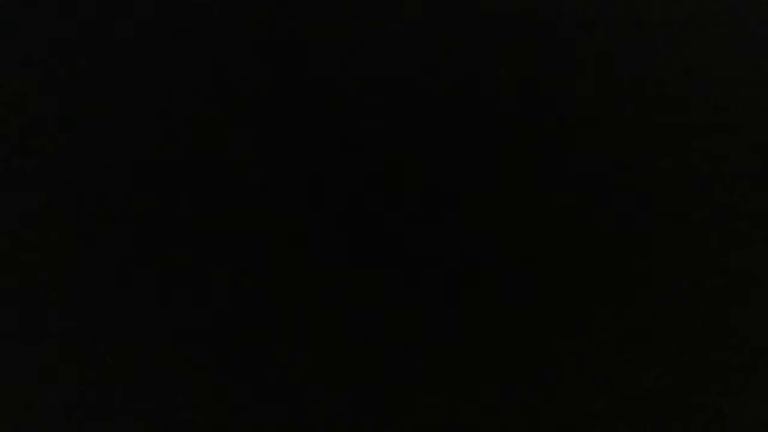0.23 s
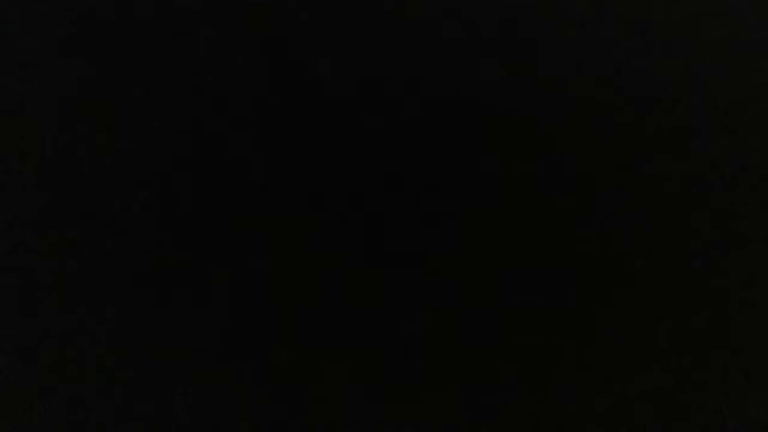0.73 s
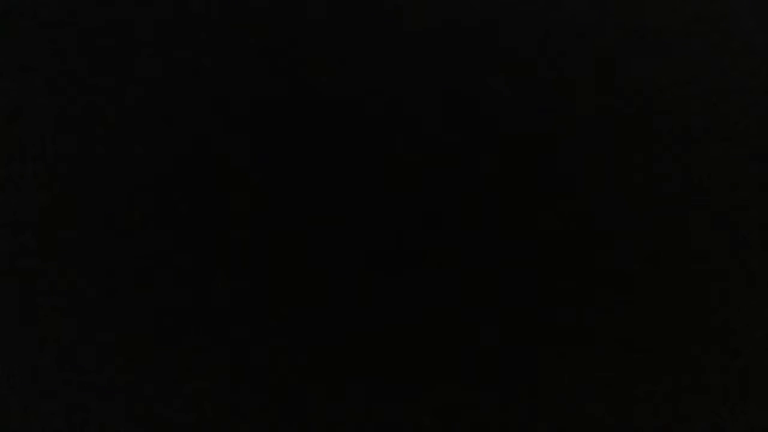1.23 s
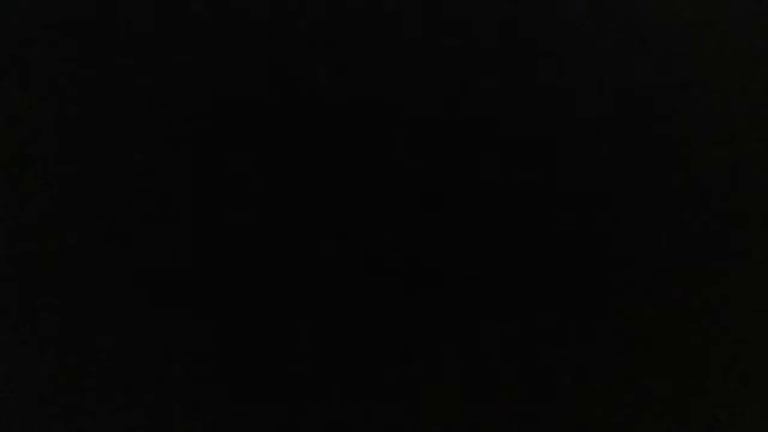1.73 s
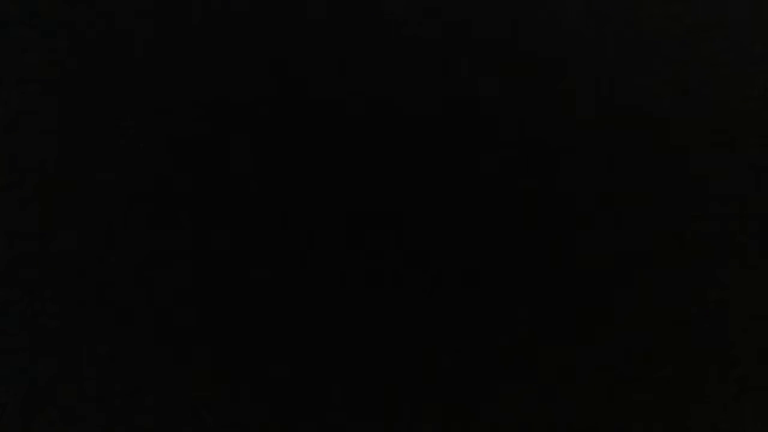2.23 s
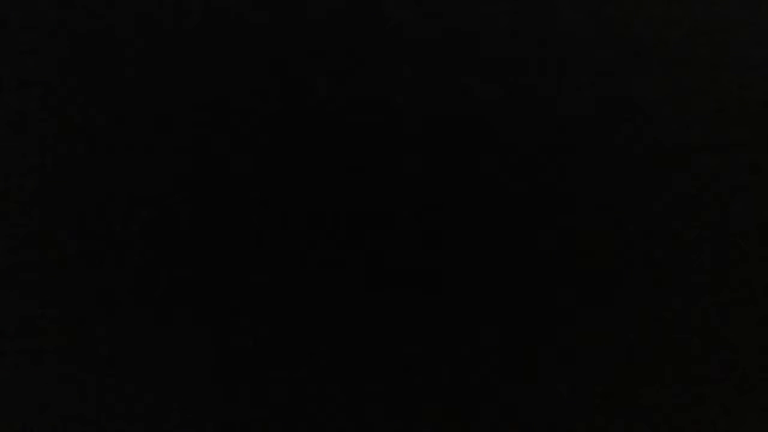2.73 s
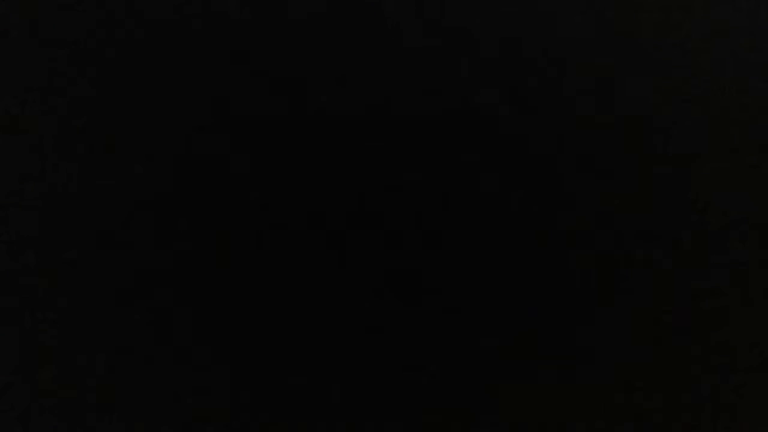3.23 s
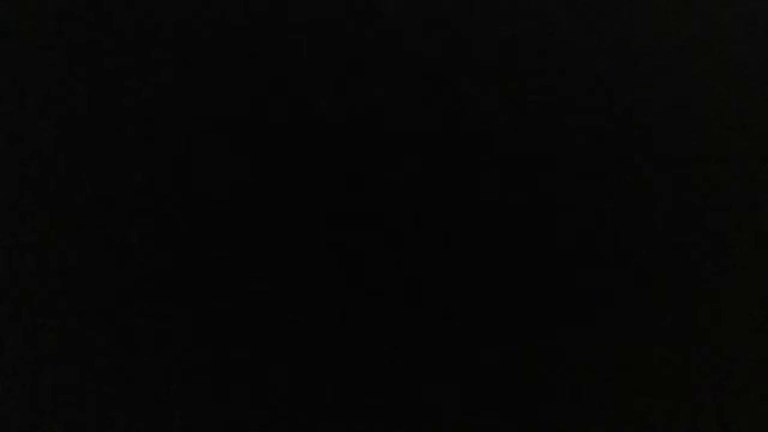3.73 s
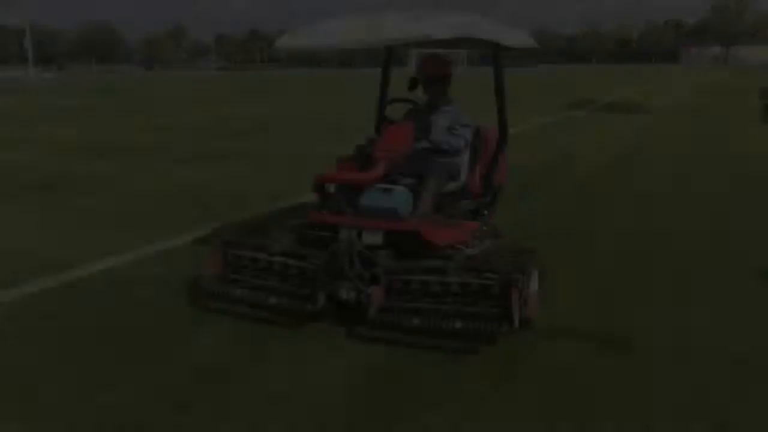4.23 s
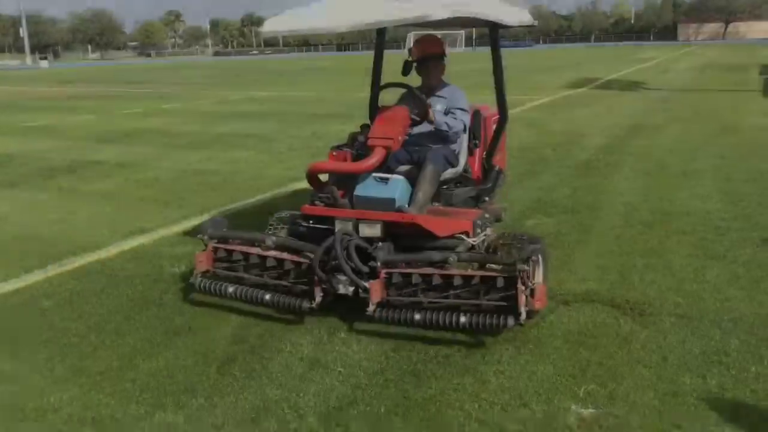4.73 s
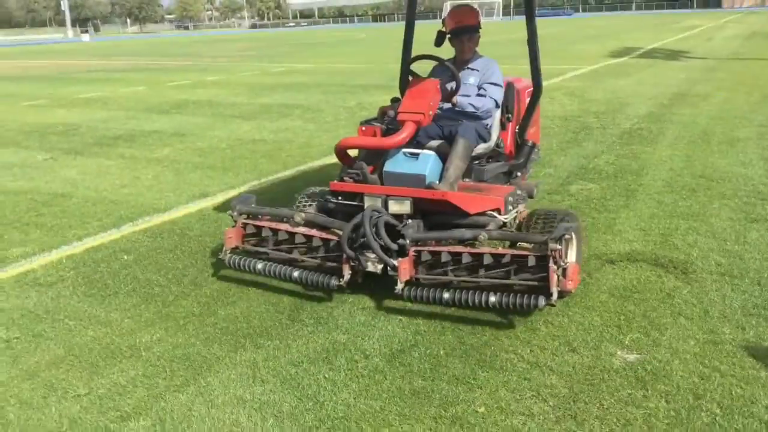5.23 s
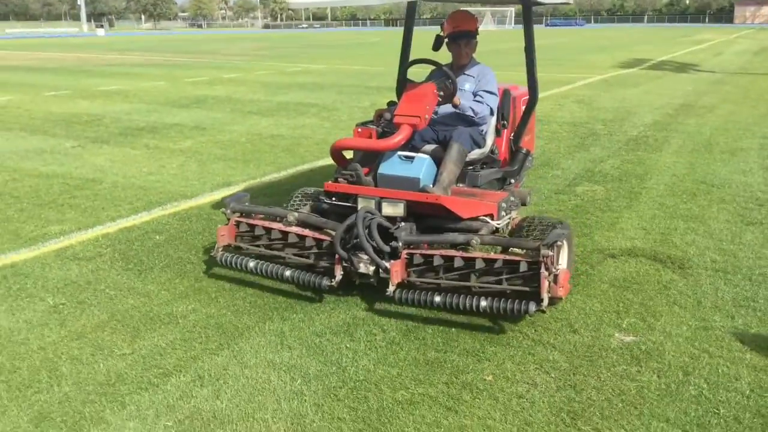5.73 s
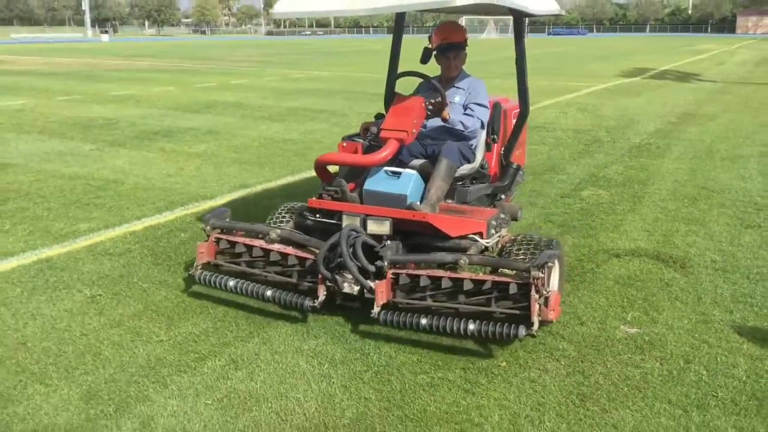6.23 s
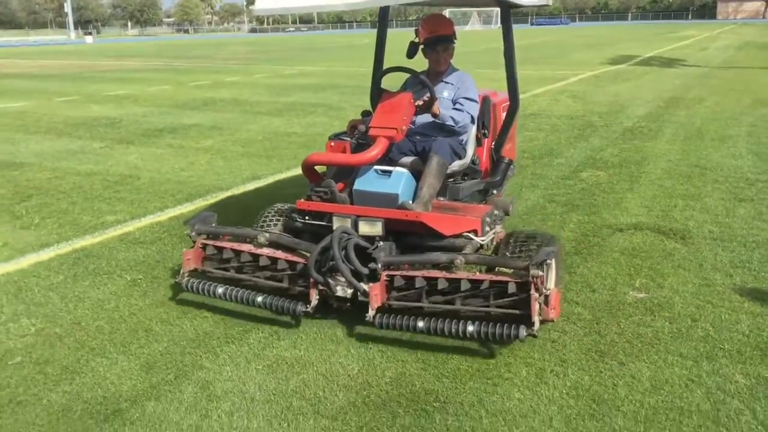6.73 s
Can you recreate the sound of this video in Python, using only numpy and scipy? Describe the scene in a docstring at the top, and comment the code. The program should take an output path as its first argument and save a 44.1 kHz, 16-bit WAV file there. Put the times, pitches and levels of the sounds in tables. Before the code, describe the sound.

A riding reel mower's diesel engine fades in and drones steadily outdoors, rattling and whining, with brief metallic squeaks and one late clank.

```python
"""A riding reel mower on a sports field, in open air: one mono microphone, no room around it.
From silence its sound fades in over the first second: diesel firing lines boom over coloured noise, loose
links rap as short rings, a fan hums, pump lines whine, and reels hiss, tick and ring. Gliding tones squeak
before 1 s; to about 3 s the engine sags under load and booms harder; faint chirps follow around 3-4 s as
the treble slowly recedes and the rumble comes nearer. Near 6 s a cutting unit clanks on its ringing modes."""
import sys
import numpy as np
from scipy import signal
from scipy.fft import rfft, irfft, next_fast_len
from scipy.io import wavfile

SR = 44100
rng = np.random.default_rng(int(sys.argv[2]) if len(sys.argv) > 2 else 0)


def digitize_waveform(pressure):
    """Quantize a signal to 16-bit integers and store it at the path in sys.argv[1].

    Rows of a 2-D input are taken as channels; values are limited to [-1, 1].
    """
    field = np.atleast_2d(pressure).T
    bounded = np.clip(field, -1, 1)
    quanta = np.round(bounded * 32767).astype(np.int16)
    wavfile.write(sys.argv[1], SR, quanta)


N = 307818
TIME = np.arange(N) / SR

# All levels hold ahead of the opening fade. Colours are relative; a part's own level sets its loudness.
# Engine speed, sagging as the reels take load: (time [s], firing rate [1/s])
ENGINE_SPEED = [(0.25, 64.7), (1.0, 64.41), (1.5, 63.83), (2.3, 63.93), (2.9, 63.69), (3.6, 64.11),
                (4.05, 64.04), (4.6, 64.33), (6.8, 64.27)]
CYLINDERS = 3   # each fires once a four-stroke cycle
FREE_FIRINGS_PER_S, FULL_LOAD_SAG_PER_S = 64.35, 0.55
PUMP_TURNS_PER_CYCLE, FAN_TURNS_PER_CYCLE = 2.3475, 2.38

# Exhaust partials: (multiple of firing rate [-], level running free at 0 s [dB],
# added at full load [dB], gain over time [dB/s], waver running free [dB])
EXHAUST_PARTIALS = [(1, -32, -7.5, 0.44, 2.06), (2, -21.5, 1.75, -0.14, 0.73), (3, -34, -4.5, 0.38, 0.8),
                    (4, -44, 6, 0.84, 1.5), (5, -37.5, -8.5, -0.18, 0), (8, -54, 10, 0.16, 3)]
LOAD_UNSTEADINESS = 0.65   # share by which the waver grows at full load
# Lesser engine lines: (multiple of the four-stroke cycle rate [-], relative level [dB])
ENGINE_LINES = [(4, -7.5), (5, -8), (7, -4), (8, -3.5), (10, -11.5), (14, -20), (21, -18), (26, -15),
                (27, -15), (30, -13), (36, -13.5), (39, -15), (45, -14.5)]
ENGINE_LINES_DB, ENGINE_LINES_LOAD_DB = -38, 3   # running free; added at full load
# Brief exhaust surges that shake the frame; negative values dip:
# (centre time [s], boom rise [dB], shake rise [dB])
THROBS = [(1.02, 1, 0), (1.182, 2.5, -1), (1.251, 1.5, 4), (1.417, 0, 1), (1.472, 0, 5), (1.578, 2.5, 1.5),
          (1.793, 1.5, 4.5), (2.112, 2.5, 7.5), (2.285, 0.7, 6.5), (2.44, 2, 6), (2.622, 1.2, 10),
          (2.792, 1.5, 14), (2.93, 0, -1), (3.046, 3, 8), (3.202, 2, -1), (3.396, 2.5, 8), (3.675, 1.5, 4),
          (3.8, 1.5, 6), (4.257, 0, 3), (4.333, 2, 5), (4.692, 2, 8), (4.819, 1.5, 2), (5.343, 1, 3),
          (5.869, 1, 4), (6.505, 0, 4), (6.767, -1.5, 5), (6.919, 0.5, 1)]
THROB_S, THUD_FOLLOWS = 0.088, 0.97   # surge length; share of the shake rise taken by the firing thud

# Frame shudder: (frequency [Hz], relative density [dB])
SHUDDER_COLOUR = [(18, -23), (32, -3), (45, -5), (58, 14), (75, -21)]
SHUDDER_DB, SHUDDER_LOAD_DB = -45, -0.5   # running free; added at full load
# Engine rumble: (frequency [Hz], relative density [dB])
RUMBLE_COLOUR = [(50, -31), (70, -4.5), (100, -0.5), (140, -9.5), (185, 1), (250, -5.5), (340, -19),
                 (420, -11.5), (700, -26.5)]
RUMBLE_DB, RUMBLE_LOAD_DB = -31.8, -1.3   # running free at 0 s; added at full load
APPROACH_DB_PER_S = 0.48   # the rumble gains as the mower creeps nearer
# Clatter of driven parts: (frequency [Hz], relative density [dB])
CLATTER_COLOUR = [(250, -17.5), (400, -7), (490, -7.5), (590, 1), (750, -0.5), (830, -6.5), (1000, -10.5),
                  (1500, -19.5)]
CLATTER_DB, CLATTER_LOAD_DB = -32, -1   # running free; added at full load
# Knock of the engine block: (frequency [Hz], relative density [dB])
KNOCK_COLOUR = [(700, -17), (1000, -0.5), (1350, 0.5), (1650, -4), (1950, -1), (2200, -4), (2500, -6.5),
                (2850, -14), (4000, -75)]
KNOCK_DB, KNOCK_LOAD_DB = -34.5, 0.5   # running free, before the treble recedes; added at full load
# The treble recedes after this time; the raps fall along with the knock
DULLING_FROM_S, KNOCK_FALL_DB_PER_S, HISS_FALL_DB_PER_S, RING_FALL_DB_PER_S = 3.15, 0.63, 0.94, 1

# Raps of loose links and covers: (frequency [Hz], relative density [dB])
RAP_COLOUR = [(350, -9), (600, 8.5), (1000, 3), (1700, -2), (2200, -3), (2600, -12), (3100, -30)]
RAP_DB, RAPS_PER_S, RAP_RING_S = -39, 170, 0.0043   # level before the treble recedes; rate; decay constant

# Cooling fan lines: (multiple of the fan's turning rate [-], relative level [dB])
FAN_LINES = [(2, -7.5), (4, -8.5), (5, -10), (6, -8), (7, -12.5), (8, -21.5)]
# The fan's wash of air: (frequency [Hz], relative density [dB])
WASH_COLOUR = [(240, -6.5), (290, -1.5), (360, -2), (450, -20)]
# Swing of the low mids: (time [s], level [dB])
LOW_MID_LEVEL = [(0.6, -1), (1.25, 3.5), (2.1, 5), (2.75, 1.5), (3.35, -10), (4.4, 2), (5.1, 2.5), (5.8, 3),
                 (6.6, 2)]
FAN_DB, FAN_LOAD_DB, WASH_DB = -32, -2, -42   # lines running free; added at full load; wash; all before the swing
FAN_FOLLOWS = 0.44   # share of the swing taken by the fan's lines

# Hydraulic whines: (time [s], piston level [dB], gear level [dB], piston octave level [dB])
WHINES = [(0.3, -37, -30.5, -40), (0.55, -34.5, -44, -44), (0.87, -53, -37, -45), (1.08, -50, -37.5, -40.5),
          (1.22, -34, -34, -49), (1.5, -31, -42, -48), (1.8, -36, -34, -38), (2.1, -34.5, -31, -34),
          (2.3, -37.5, -31.5, -34.5), (2.45, -44.5, -32, -38.5), (2.7, -37.5, -39, -39.5),
          (2.95, -39.5, -37, -42), (3.2, -40, -46, -37.5), (3.55, -43, -43, -43.5),
          (3.78, -42.5, -47, -34.3), (4.25, -42.5, -38.5, -38.5), (4.55, -40.5, -36.5, -40.5),
          (4.8, -44, -37.5, -52), (5.25, -43.5, -43, -43), (5.8, -42.5, -38.5, -39), (6.4, -41, -47, -56),
          (6.9, -55, -43, -63)]
DRIVE_HUM_DB, DRIVE_HUM_LOAD_DB = -50.5, 8   # running free; added at full load

# Reels in the grass: (frequency [Hz], relative density [dB])
HISS_COLOUR = [(1800, -67), (3100, -0.5), (3400, -5), (3950, -4), (4300, -2), (5200, -4.5), (6100, -4.5),
               (7100, -2), (7700, -7), (8500, -1.5), (9500, -2.5), (12500, -8.5), (14500, -16.5),
               (15800, -25)]
HISS_DB = -45.5   # before the treble recedes
TICKING_DB, TICKING_LOAD_DB = -48.5, 1   # running free; added at full load
# Lower blade and bed-knife rings, beside a steady singing tone:
# (frequency [Hz], width [Hz], relative level [dB])
LOW_RINGS = [(2200, 200, -4.5)]
# Higher blade and bed-knife rings: (frequency [Hz], width [Hz], relative level [dB])
HIGH_RINGS = [(3620, 36, -1.5), (5430, 60, -6)]
SING_HZ, SING_DB = 2138, -2   # level relative to the low rings
LOW_RING_DB, HIGH_RING_DB = -47, -58.5   # between rubs, before the treble recedes
# A reel presses on its bed knife; negative values soften:
# (start time [s], length [s], low ring rise [dB], high ring rise [dB])
BLADE_RUBS = [(0.85, 0.24, 15, 3), (1.14, 0.11, 7, 0), (1.35, 0.22, 9.5, -6), (1.568, 0.18, 11.5, -7),
              (1.84, 0.082, 9, 0), (3.1, 0.4, 5, 6), (3.68, 0.24, 4, 0), (3.93, 0.13, 6, 4),
              (4.1, 0.2, 8.5, 0), (3.95, 1.2, 2.5, 9), (6.25, 0.52, -1, 11.5)]

# Stick-slip squeaks: (start time [s], length [s], start pitch [Hz], end pitch [Hz],
# level [dB], roughness [share of the pitch])
SQUEAKS = [(.808, .04, 4300, 3950, -44, .04), (.843, .026, 4700, 4950, -40, .03),
           (.842, .075, 4020, 3800, -36, .012), (.847, .02, 5900, 5600, -39, .07),
           (.851, .018, 11350, 11200, -35.5, .012), (.853, .033, 5440, 5410, -26.5, .009),
           (.858, .032, 10750, 10500, -36, .022), (.878, .022, 5400, 5430, -35, .012),
           (.875, .025, 3880, 3860, -38, .015), (.903, .03, 5500, 5470, -39, .02),
           (.921, .012, 5350, 5300, -37, .04), (.941, .014, 5620, 5660, -39, .02),
           (.99, .08, 1010, 990, -32, .04), (3.21, .025, 2130, 2050, -37, .06),
           (3.25, .035, 1900, 1960, -36, .06), (3.303, .025, 1950, 2200, -34, .09),
           (3.345, .045, 1880, 1900, -39.5, .07), (3.397, .03, 1830, 2000, -32, .07),
           (3.69, .065, 2280, 2130, -36, .03), (3.963, .035, 2250, 2040, -33.5, .03),
           (5.925, .025, 5750, 5830, -46, .015), (6.502, .02, 5700, 5850, -44.5, .015)]
SQUEAK_T60_S, SQUEAK_TAIL_DB = 0.15, -11
# A cutting unit rattles: (start time [s], length [s], ring level [dB], scrape level [dB])
RATTLES = [(.843, .025, -52, -43), (.903, .045, -43, -38.5), (6.081, .025, -44, -48)]
# Cutting unit modes: (frequency [Hz], width [Hz], relative level [dB])
UNIT_MODES = [(1380, 45, 2), (2330, 150, -7), (3130, 100, -16), (4250, 80, -15), (4560, 80, -17),
              (6500, 120, -18)]
# A cutting unit drops and bounces: (time [s], level [dB], brightness [dB per octave above the lowest mode])
CLANKS = [(6.078, -25.5, -8), (6.084, -41, 4.5), (6.091, -35.5, 3), (6.104, -41, 3), (6.113, -38, -3)]
CLANK_RISE_S, CLANK_CHATTER = 0.004, 0.13   # chatter: spread of the ring's phase, in cycles

FADE_START_S, FADE_S, CLOSE_S = 0.097, 1.01, 0.015
CUTOFF_HZ = 16200   # 70 dB down from here up


def from_db(db):
    """Decibels to gain."""
    return 10 ** (np.asarray(db) / 20)


def rms_one(x):
    """Scale to unit rms."""
    return x / np.sqrt(np.mean(x ** 2) + 1e-20)


def in_time(rows):
    """Each column of a curve, at every sample."""
    s, *columns = np.transpose(rows)
    return [np.interp(TIME, s, c) for c in columns]


def drift(rate):
    """Slow random wandering with spread 1; rate is its corner in Hz."""
    step = 40   # samples between computed points
    r = np.exp(-2 * np.pi * rate * step / SR)
    noise = rng.standard_normal(N // step + 2002)
    slow = signal.lfilter([1], [1, -2 * r, r * r], noise)[2000:]   # skip the filter's settling
    return np.interp(np.arange(N) / step, np.arange(len(slow)), rms_one(slow))


def coloured(x, colour):
    """Shape an excitation's spectrum by a colour, with skirts outside it; rms 1."""
    hz, db = np.transpose(colour)
    size = next_fast_len(N)
    f = np.maximum(np.arange(size // 2 + 1) * SR / size, 1)
    skirts = np.minimum(f / hz[0], 1) ** 3 * np.minimum(hz[-1] / f, 1) ** 3
    gain = skirts * from_db(np.interp(np.log(f), np.log(hz), db))
    return rms_one(irfft(rfft(x, size) * gain, size)[:N])


def resonate(x, hz, width_hz):
    """One damped mode answers an excitation; a wider mode dies sooner."""
    r = np.exp(-np.pi * width_hz / SR)
    return signal.lfilter([1, 0, -1], [1, -2 * r * np.cos(2 * np.pi * hz / SR), r * r], x)


def rubbed(modes):
    """Resonances kept ringing by friction noise, each at its own rms level."""
    return sum(from_db(db) * rms_one(resonate(rng.standard_normal(N), hz, width_hz))
               for hz, width_hz, db in modes)


def tone(turns):
    """A sine of rms 1."""
    return np.sqrt(2) * np.sin(2 * np.pi * turns)


def line(turns, waver_db):
    """A sine locked to a shaft, wavering in strength."""
    return tone(turns + rng.random()) * from_db(waver_db * drift(3.1))


def bursts(turns, low_db, high_db):
    """Steady noise plus a dying flare each turn, of random level between two bounds relative to it."""
    turn = turns.astype(int)
    strength = from_db(rng.uniform(low_db, high_db, turn.max() + 1))[turn]
    flare = strength * np.exp(-3.5 * (turns % 1))
    return rng.standard_normal(N) * np.sqrt(1 + flare ** 2)


def swell(start, length):
    """A rounded rise and fall."""
    return np.sin(np.pi * np.clip((TIME - start) / length, 0, 1))


def load():
    """Engine effort from its sag in speed: 0 running free, 1 at full load, a little over at the deepest."""
    return (FREE_FIRINGS_PER_S - in_time(ENGINE_SPEED)[0]).clip(0) / FULL_LOAD_SAG_PER_S


def dulling(db_per_s):
    """Gain of a bright part: steady at first, then slowly falling."""
    return from_db(-db_per_s * np.maximum(TIME - DULLING_FROM_S, 0))


def throb():
    """Change in dB during the brief surges: of the exhaust's boom, and of the shaking frame."""
    shapes = np.array([swell(s - THROB_S / 2, THROB_S) for s, _, _ in THROBS])
    return np.array(THROBS)[:, 1:].T @ shapes


def exhaust(cycles):
    """Three firings a cycle: a thud, a boom an octave above, overtones, and lines from unequal cylinders."""
    firings, effort = CYLINDERS * cycles + 0.0088 * drift(23), load()
    unsteady = 1 + LOAD_UNSTEADINESS * effort
    partials = []
    # the partials start together on every firing, so they add up to one sharp puff
    for k, db, load_db, db_per_s, waver_db in EXHAUST_PARTIALS:
        level_db = db + load_db * effort + db_per_s * TIME + waver_db * unsteady * drift(22.5)
        partials.append(from_db(level_db) * tone(k * firings))
    thud, *overtones = partials
    lesser = sum(from_db(db) * line(k * (cycles + 0.00048 * drift(3.9)), waver_db=2)
                 for k, db in ENGINE_LINES)
    boom = sum(overtones) + from_db(ENGINE_LINES_DB + ENGINE_LINES_LOAD_DB * effort) * lesser
    boom_db, shake_db = throb()
    return from_db(THUD_FOLLOWS * shake_db) * thud + from_db(boom_db) * boom


def chassis(cycles, turns):
    """Frame shudder, near-steady rumble and knock noise, and driven parts clattering five times a turn."""
    firings, effort = CYLINDERS * cycles, load()
    _, shake_db = throb()
    shudder_db = SHUDDER_DB + SHUDDER_LOAD_DB * effort + shake_db + 1.4 * drift(2)
    shudder = from_db(shudder_db) * coloured(rng.standard_normal(N), SHUDDER_COLOUR)
    rumble_db = RUMBLE_DB + RUMBLE_LOAD_DB * effort + APPROACH_DB_PER_S * TIME
    rumble = from_db(rumble_db) * coloured(bursts(firings, -45, -31), RUMBLE_COLOUR)
    clatter_db = CLATTER_DB + CLATTER_LOAD_DB * effort
    clatter = from_db(clatter_db) * coloured(bursts(5 * turns, 8.5, 9.5), CLATTER_COLOUR)
    lope_db = 0.48 * np.sin(2 * np.pi * cycles) + 1.36 * drift(24)   # one cylinder knocks harder
    knock_db = KNOCK_DB + KNOCK_LOAD_DB * effort + lope_db
    knock = from_db(knock_db) * coloured(bursts(firings, -62.5, -43.5), KNOCK_COLOUR)
    return shudder + rumble + clatter + knock * dulling(KNOCK_FALL_DB_PER_S)


def linkage(count=6):
    """Loose links and covers rap at uneven moments; each answers with its own dense metallic ring."""
    raps = (rng.random(N) < RAPS_PER_S / SR) * from_db(rng.uniform(-7.8, 6.5, N))
    part = rng.integers(0, count, N)
    age = TIME[:SR // 30]
    rings = rng.standard_normal((count, len(age))) * np.exp(-age / RAP_RING_S)
    rattle = sum(signal.oaconvolve(raps * (part == k), ring)[:N] for k, ring in enumerate(rings))
    return from_db(RAP_DB) * dulling(KNOCK_FALL_DB_PER_S) * coloured(rattle, RAP_COLOUR)


def fan(turns):
    """A belt-driven stack of lines that beats against the exhaust, over a low wash of air."""
    slipping = turns + 0.0085 * drift(2.2)
    swing_db, = in_time(LOW_MID_LEVEL)
    lines = sum(from_db(db) * line(k * slipping, waver_db=2) for k, db in FAN_LINES)
    lines_db = FAN_DB + FAN_LOAD_DB * load() + FAN_FOLLOWS * swing_db
    wash = coloured(rng.standard_normal(N), WASH_COLOUR)
    return from_db(lines_db) * lines + from_db(WASH_DB + swing_db) * wash


def pumps(turns):
    """Nine pistons and thirteen gear teeth pulse the oil each turn; the drive hums between, more under load."""
    piston_db, gear_db, octave_db = in_time(WHINES)
    whines = sum(from_db(db) * line(k * turns, waver_db=0.6)
                 for k, db in [(9, piston_db), (13, gear_db), (18, octave_db)])
    hum_db = DRIVE_HUM_DB + DRIVE_HUM_LOAD_DB * load()
    return whines + from_db(hum_db) * line(11 * turns, waver_db=2.2)


def ticking(per_s, width_hz, count=64):
    """Small scattered contacts of steel, each ringing briefly on one of many high modes."""
    out = 0
    for hz in np.geomspace(2900, 6300, count) * (1 + 0.0031 * rng.standard_normal(count)):
        taps = (rng.random(N) < per_s / count / SR) * rng.uniform(-0.88, 1, N)
        out = out + resonate(taps + 1e-18, hz, width_hz)
    return coloured(out, HISS_COLOUR)


def reels(cycles):
    """Blades hiss through the grass, tick, and ring against the bed knives."""
    hiss = coloured(bursts(CYLINDERS * cycles, -32.5, -21.5), HISS_COLOUR)   # flares stay faint
    hiss = from_db(HISS_DB + 0.97 * drift(21)) * dulling(HISS_FALL_DB_PER_S) * hiss
    low_db = LOW_RING_DB + sum(db * swell(s, length) for s, length, db, _ in BLADE_RUBS)
    high_db = HIGH_RING_DB + sum(db * swell(s, length) for s, length, _, db in BLADE_RUBS)
    singing = from_db(SING_DB) * tone(SING_HZ * TIME + 0.2 * drift(11))
    low_rings = from_db(low_db + drift(16)) * (singing + rubbed(LOW_RINGS))
    rings = low_rings + from_db(high_db) * rubbed(HIGH_RINGS)
    ticks = from_db(TICKING_DB + TICKING_LOAD_DB * load()) * ticking(per_s=900, width_hz=32)
    return hiss + dulling(RING_FALL_DB_PER_S) * rings + ticks


def squeak():
    """Dry metal sticks and slips, singing on rough tones that linger briefly in the frame."""
    out = 0
    stutter, wobble = drift(140), drift(388)
    for s, length, start_hz, end_hz, db, rough in SQUEAKS:
        hz = np.interp(TIME, [s, s + length], [start_hz, end_hz]) * (1 + rough * wobble)
        out = out + from_db(db + 2 * stutter) * swell(s, length) * tone(np.cumsum(hz) / SR)
    age = TIME[:SR // 5]
    tail = rng.standard_normal(len(age)) * from_db(-60 * age / SQUEAK_T60_S)
    tail = tail / np.linalg.norm(tail)
    return out + from_db(SQUEAK_TAIL_DB) * signal.oaconvolve(out, tail)[:N]


def rattles():
    """A cutting unit shifts on its arm: a scrape and the ring of its frame."""
    lowpass = signal.butter(2, 7500, fs=SR, output="sos")
    ring = signal.sosfilt(lowpass, rubbed(UNIT_MODES))
    scrape = coloured(rng.standard_normal(N), [(3000, 1), (6500, 0), (12000, -7)])
    return sum(swell(s, length) * (from_db(ring_db) * ring + from_db(scrape_db) * scrape)
               for s, length, ring_db, scrape_db in RATTLES)


def clanks():
    """A cutting unit drops on its stop and bounces, chattering; each contact has its own brightness."""
    out = np.zeros(N)
    age = TIME[:SR // 10]
    envelope = age / CLANK_RISE_S * np.exp(1 - age / CLANK_RISE_S)
    for hz, width_hz, mode_db in UNIT_MODES:
        ring = tone(hz * TIME + CLANK_CHATTER * drift(2 * width_hz))
        octaves = np.log2(hz / UNIT_MODES[0][0])
        for s, db, tilt_db in CLANKS:
            start = int(s * SR)
            span = slice(start, start + len(age))
            out[span] += from_db(db + mode_db + tilt_db * octaves) * envelope * ring[span]
    return out


def scene():
    """One engine turns the fan, pumps and reels of the mower, in the open air."""
    cycles = np.cumsum(in_time(ENGINE_SPEED)[0]) / SR / CYLINDERS
    turns = PUMP_TURNS_PER_CYCLE * cycles + 0.003 * drift(8.8)
    engine = exhaust(cycles) + chassis(cycles, turns) + linkage() + fan(FAN_TURNS_PER_CYCLE * cycles)
    return (engine + pumps(turns) + reels(cycles) + squeak() + rattles() + clanks())[None]


def record(dry):
    """One microphone: an even fade in from silence, a short fade at the close, and the top cut."""
    opening = np.clip((TIME - FADE_START_S) / FADE_S, 0, 1)
    closing = np.minimum((TIME[-1] - TIME) / CLOSE_S, 1)
    top_cut = signal.cheby2(16, 70, CUTOFF_HZ, fs=SR, output="sos")
    return signal.sosfilt(top_cut, dry * opening * closing)


dry = scene()
out = record(dry)
digitize_waveform(out)
```